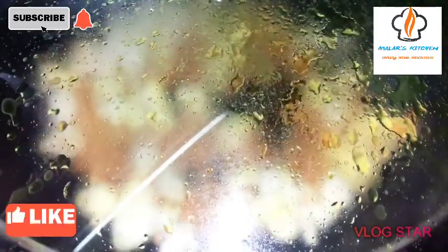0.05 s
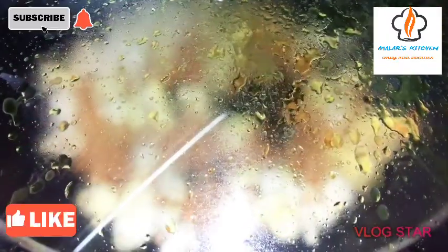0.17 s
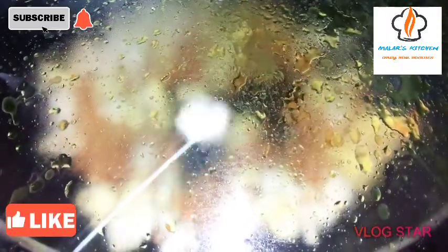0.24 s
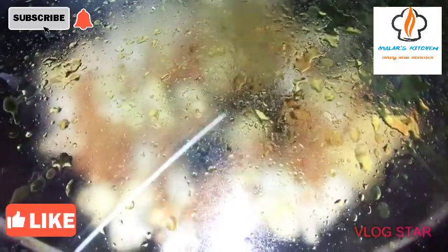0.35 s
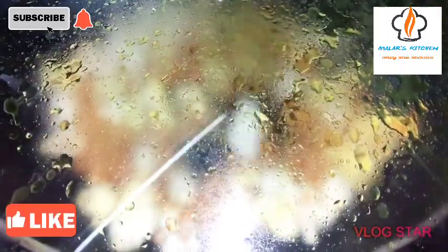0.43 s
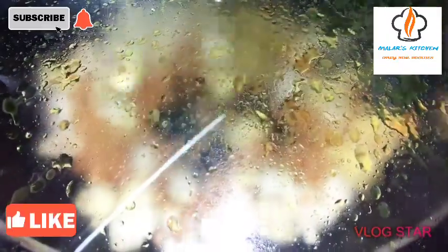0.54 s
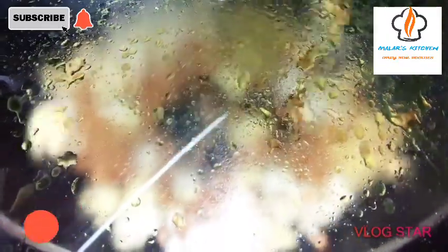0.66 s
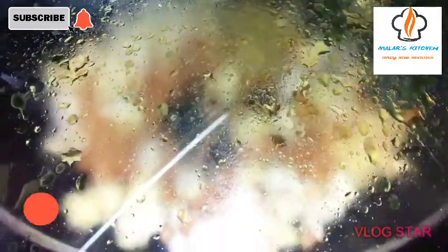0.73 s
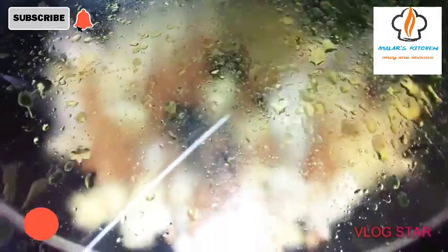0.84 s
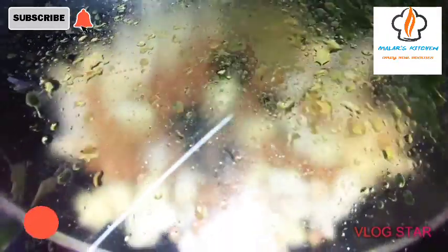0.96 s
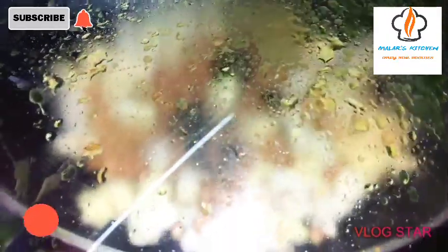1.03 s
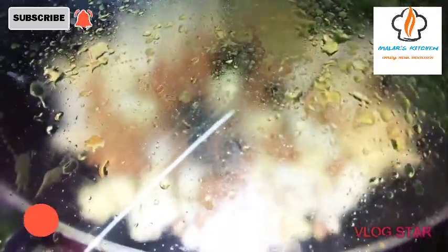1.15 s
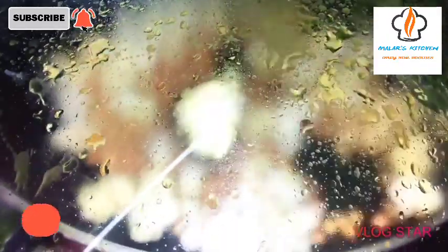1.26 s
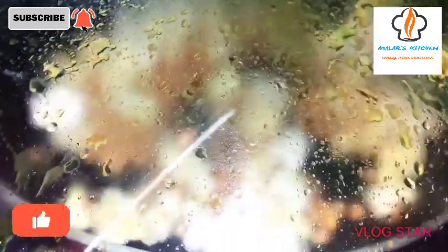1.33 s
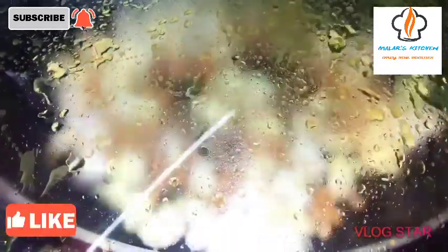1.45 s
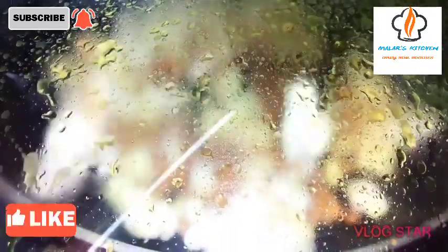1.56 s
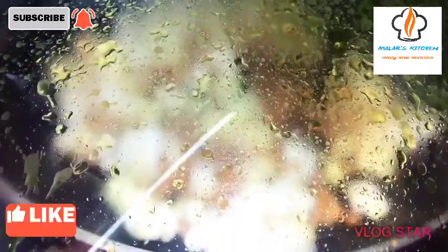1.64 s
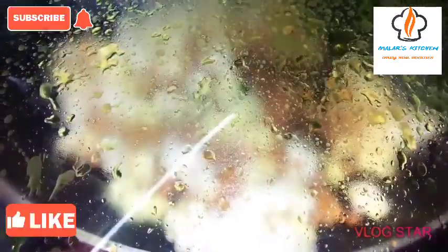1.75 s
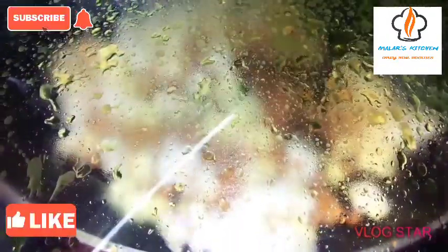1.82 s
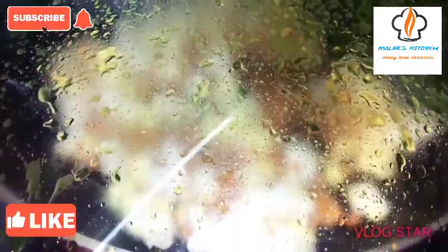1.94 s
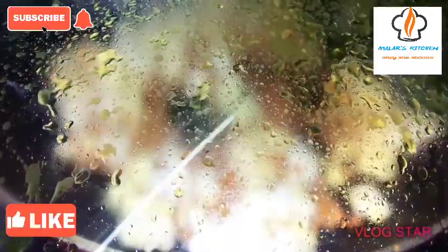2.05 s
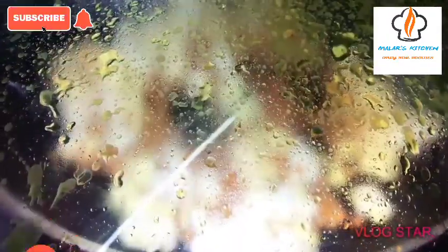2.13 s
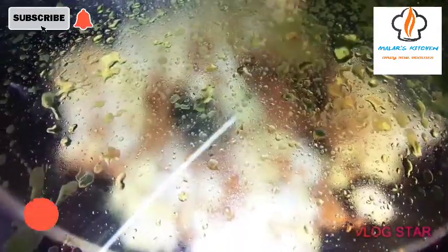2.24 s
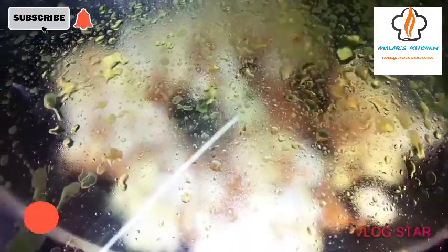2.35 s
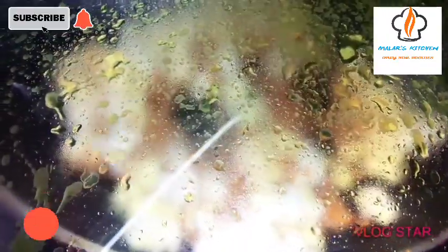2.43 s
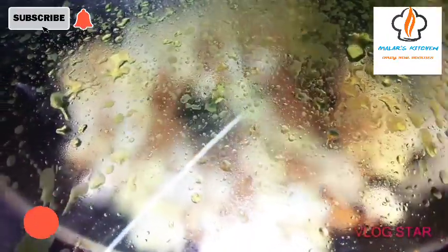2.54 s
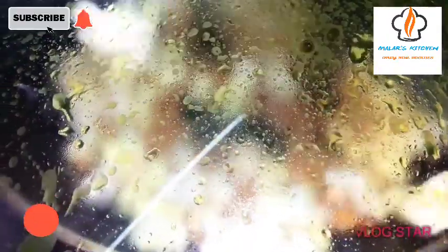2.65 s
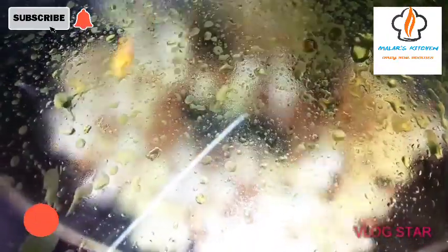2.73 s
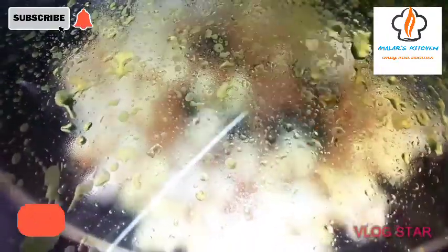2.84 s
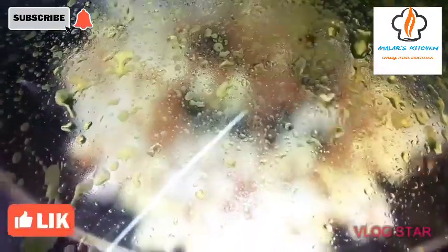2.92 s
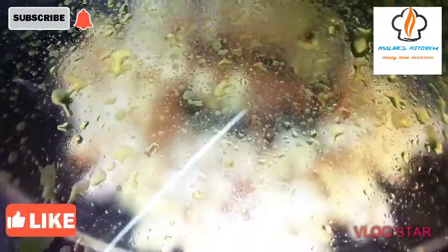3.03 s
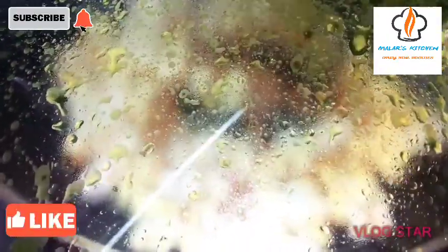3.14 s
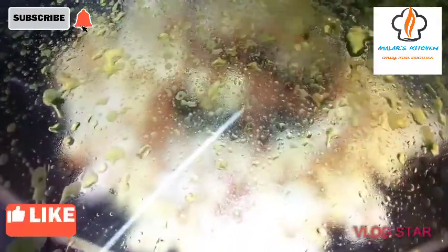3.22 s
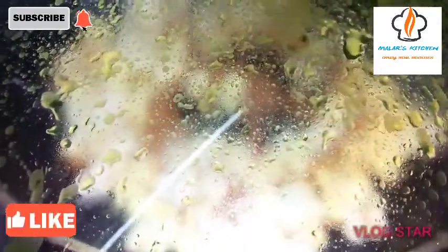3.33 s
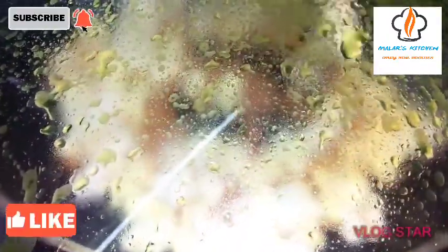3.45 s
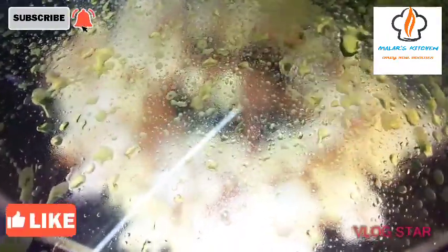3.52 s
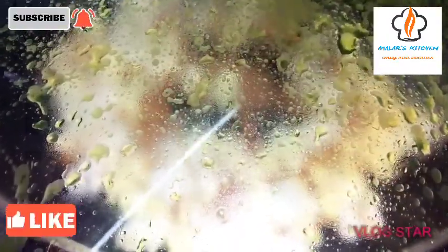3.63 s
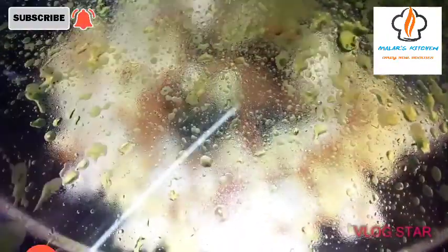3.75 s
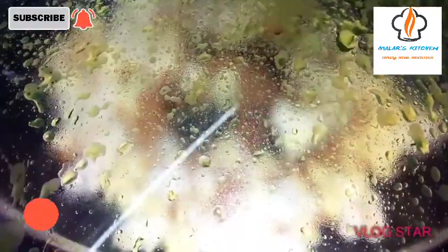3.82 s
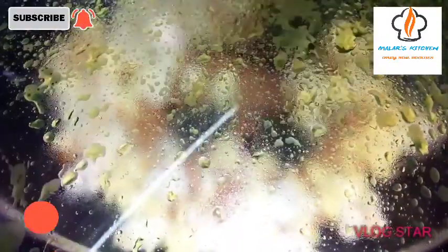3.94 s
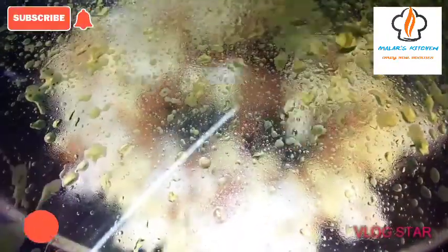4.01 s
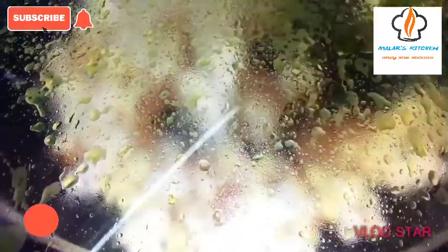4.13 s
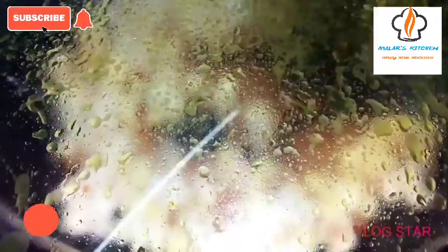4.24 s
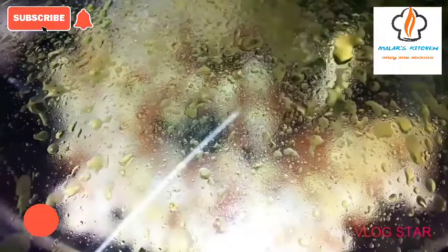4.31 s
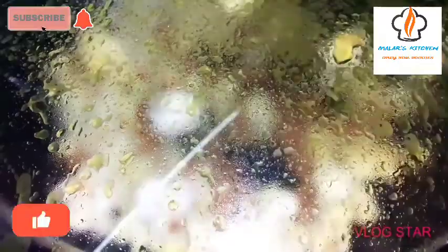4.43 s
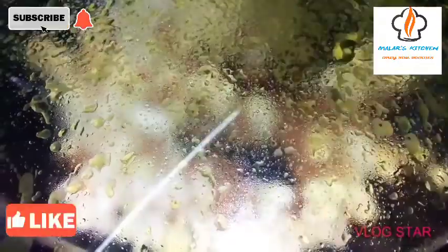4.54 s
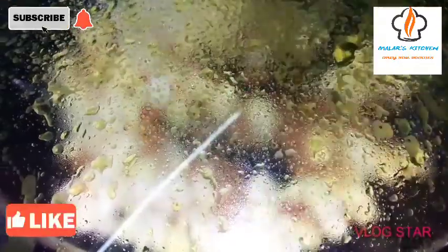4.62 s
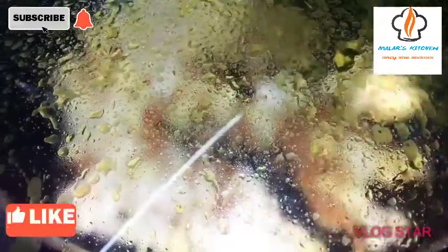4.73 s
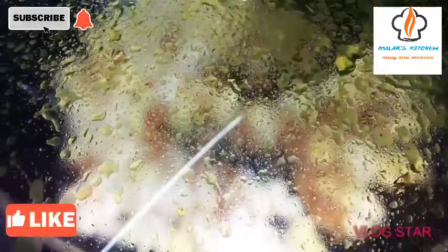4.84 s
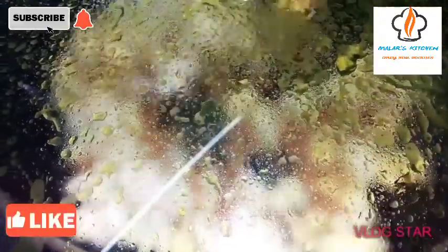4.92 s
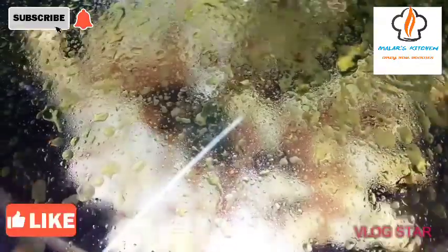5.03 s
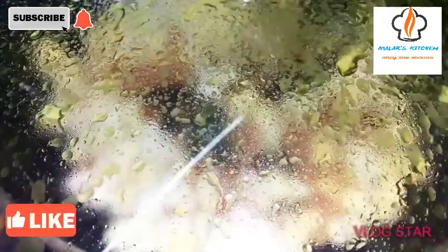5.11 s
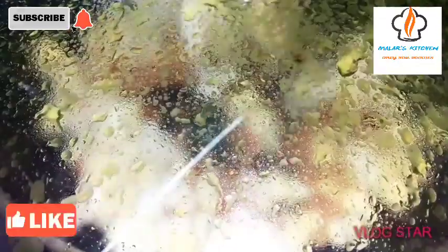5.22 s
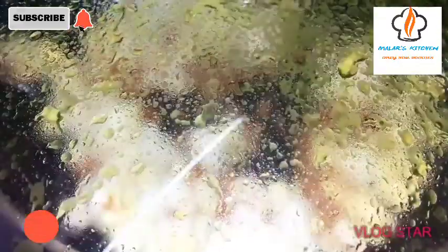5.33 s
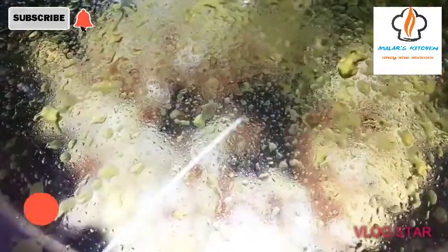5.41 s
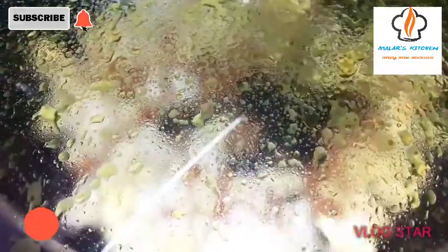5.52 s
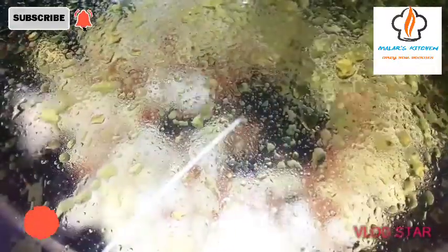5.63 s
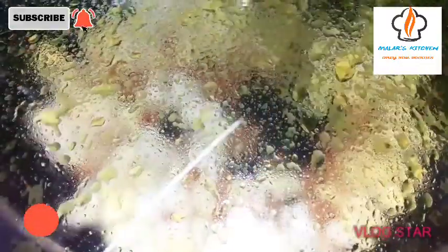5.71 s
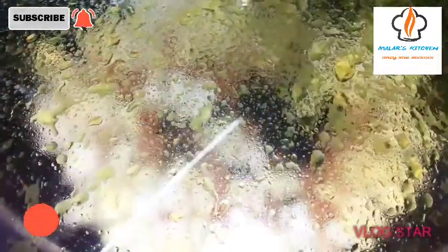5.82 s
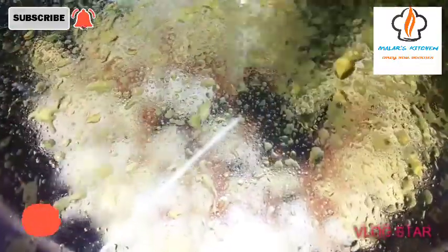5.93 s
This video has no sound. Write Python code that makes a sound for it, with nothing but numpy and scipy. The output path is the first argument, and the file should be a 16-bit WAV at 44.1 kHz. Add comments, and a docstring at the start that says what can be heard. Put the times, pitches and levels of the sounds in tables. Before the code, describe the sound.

Dry, snappy pops and small pings against a lid come ever faster above faint frying and a low stove drone.

```python
"""Oil sizzles quietly over the low drone of a stove; then popcorn pops in a pan under a glass lid.
Sizzle, a steamy hiss near the end and drone are shaped noise: bubbles add grain, resonances hum.
Each pop is a torn-noise crack with splinters, a kick and a thump on the pan, and a puff of steam.
These excite decaying modes of air, pan, stand and rim; a small kitchen reflects the pops to a close phone.
Dry ticks follow, steam spits from a few hulls, knocks and soft scuffs sound, and hard kernels ping the lid."""
import sys
import numpy as np
from scipy import signal
from scipy.fft import rfft, irfft, next_fast_len
from scipy.io import wavfile
from scipy.ndimage import map_coordinates

SR = 44100
rng = np.random.default_rng(int(sys.argv[2]) if len(sys.argv) > 2 else 0)


def digitize_waveform(pressure):
    """Quantize a signal to 16-bit integers and store it at the path in sys.argv[1].

    Rows of a 2-D input are taken as channels; values are limited to [-1, 1].
    """
    field = np.atleast_2d(pressure).T
    bounded = np.clip(field, -1, 1)
    quanta = np.round(bounded * 32767).astype(np.int16)
    wavfile.write(sys.argv[1], SR, quanta)


N = 263277
TIME = np.arange(N) / SR  # s

# Stove drone spectrum: (frequency [Hz], relative level [dB])
STOVE_SPECTRUM = [(20, -21), (45, -33), (90, 2), (160, -1.5), (200, -4.5), (270, -17.5), (340, -5.5),
                  (450, -16.5), (900, -14), (3000, -75)]
# Stove loudness: (time [s], level [dB])
STOVE_LEVEL = [(0, -58.5), (.8, -59.5), (1.5, -57.5), (3, -57), (5.97, -53.5)]
# Frying oil spectrum: (frequency [Hz], relative level [dB])
OIL_SPECTRUM = [(300, -27), (700, -11.5), (1800, 0), (2100, -5), (2900, -4), (3700, -2), (4800, -0.5),
                (7400, -2.5), (8200, -5.5), (9600, -5.5), (11800, -29), (13700, -11), (14800, -9),
                (16000, 2.5)]
# Sizzle loudness: (time [s], level [dB])
SIZZLE_LEVEL = [(0, -48), (.3, -47), (1.1, -46), (2.5, -46), (3.3, -45.5), (3.7, -47.5), (4.7, -47.5),
                (5.97, -44.5)]
# Resonances of the covered pan that colour the sizzle: (frequency [Hz], width [Hz], relative level [dB])
SIZZLE_RESONANCES = [(2055, 15, 7.5), (2215, 18, -0.5), (2290, 15, 6), (2663, 27, 5), (2870, 40, -5.5),
                     (3100, 17, 4.5), (4830, 31, 3.5), (5200, 51, -14), (5570, 80, -4.5), (6540, 84, -1),
                     (6640, 70, -9), (7530, 116, -1.5), (9540, 270, -4), (10870, 420, -11.5)]
# Hiss of moisture in the oil: (time [s], level [dB])
STEAM_LEVEL = [(5.2, -81), (5.3, -35.5), (5.45, -37), (5.56, -35), (5.63, -42), (5.7, -58)]
# Spectrum of that hiss: (frequency [Hz], relative level [dB])
STEAM_SPECTRUM = [(1000, 0.5), (3000, 5.5), (5600, -12), (7800, 5), (8800, 12.5), (10500, 3), (13300, -10),
                  (15000, 6.5)]
# Bursting kernels: (time [s], crack level [dB], crack pitch [Hz], kick on the pan [dB],
# steam puff [dB], splintering of the hull [dB])
POPS = [(0.2986, -16, 4830, -34.5, -30, -34.5), (0.3954, -13.5, 6600, -33.5, -34, -25),
        (0.5592, -13.5, 6040, -29, -27.5, -28), (0.816, -15.5, 6900, -29.5, -28, -32),
        (1.2457, -11, 5340, -30.5, -36, -24.5), (1.3255, -15, 5560, -33, -33, -29),
        (1.4889, -13.5, 5540, -40, -34, -33), (1.5126, -21, 5100, -31, -37.5, -30.5),
        (1.545, -10, 5900, -36, -43, -24), (1.5771, -13, 5900, -39, -34, -22.5),
        (2.0232, -15, 5200, -33.5, -29, -24), (2.0388, -14, 5370, -34, -37, -36),
        (2.2355, -9, 5760, -36, -36, -22), (2.5841, -26, 4000, -31.5, -38.5, -35),
        (2.6224, -7, 5400, -25.5, -30, -24.5), (2.8135, -14.5, 5300, -37, -55, -34),
        (2.8224, -15, 5670, -32, -29, -28), (3.0898, -17.5, 4230, -29, -37.5, -36.5),
        (3.4388, -10, 3840, -29, -33.5, -31.5), (3.7543, -15.5, 5300, -28, -38, -33.5),
        (3.8771, -13.5, 4600, -29, -33.5, -31), (4.0502, -20, 7400, -31.5, -43.5, -54),
        (4.116, -13.5, 5620, -30, -29.5, -22), (4.213, -12.5, 5240, -38, -41, -34),
        (4.228, -13.5, 3980, -29.5, -32.5, -25.5), (4.3278, -14, 5580, -31, -31, -24),
        (4.4401, -8, 5100, -27, -33.5, -19), (4.5005, -7.5, 5600, -29.5, -30.5, -27),
        (4.778, -16, 5230, -36, -44.5, -30), (4.9521, -9, 4980, -30.5, -39.5, -49),
        (5.0185, -5.5, 6000, -30.5, -29, -18), (5.2031, -15, 6500, -28, -31.5, -33),
        (5.292, -10, 5600, -32.5, -29, -28), (5.3203, -9, 5050, -30, -42, -28),
        (5.369, -12.5, 5070, -34, -34.5, -28.5), (5.5163, -13, 4900, -29.5, -41.5, -31),
        (5.5505, -10.5, 6860, -37, -29, -27), (5.682, -13, 5600, -32.5, -28, -29),
        (5.8333, -12, 5900, -33, -38, -26.5), (5.9563, -18.5, 8400, -31, -30, -20)]
# Crack of a hull: (frequency [Hz], relative level [dB])
CRACK_SPECTRUM = [(1500, -17), (2800, -4), (4000, -3.5), (5500, -1.5), (7200, -4.5), (9300, -2),
                  (10300, -8), (12300, -14.5), (13800, -18), (14600, 2), (15700, 3)]
# Damped pan bottom: (frequency [Hz], width [Hz], relative level [dB])
PAN_BODY = [(1312, 145, 4.5), (1944, 170, 2), (2277, 35, 5.5), (2522, 66, 6.5)]
# Air under the lid: (frequency [Hz], width [Hz], relative level [dB])
AIR_BODY = [(526, 128, 14.5), (714, 69, -8)]
# The whole pan on its stand: (frequency [Hz], width [Hz], relative level [dB])
STAND_BODY = [(126, 76, 2), (224, 54, 6), (332, 88, -13)]
# Lasting ring of the air under the lid: (frequency [Hz], relative level [dB], t60 [s])
AIR_MODES = [(389, -16, 0.42), (450, -44, 0.32), (508.7, -11, 0.3), (566.7, -2, 0.51), (600, -18, 0.23)]
# Lasting ring of the pan on its stand: (frequency [Hz], relative level [dB], t60 [s])
STAND_MODES = [(101.3, -11.5, 0.65), (144.4, -6, 0.47), (200.3, -6, 0.82), (227.2, -11, 0.34),
               (287.4, -12, 0.53)]
# Lasting ring of the pan's metal: (frequency [Hz], relative level [dB], t60 [s])
PAN_MODES = [(1356, -3, 0.074), (1973, -6.5, 0.19), (2210, -14, 0.16), (2620, -5.5, 0.056)]
# Thin, high modes of the rim and lid: (frequency [Hz], relative level [dB], t60 [s])
RIM_MODES = [(3200, -15, 0.07), (3930, -21.5, 0.16), (4640, -42, 0.064), (5400, -38, 0.16),
             (5740, -28, 0.12), (5600, -8, 0.073), (6900, -25, 0.37), (7200, -24, 0.13), (8700, -24, 0.08),
             (9600, -22, 0.093)]
# Dry ticks with little thump, popped pieces landing and perhaps a few small pops:
# (time [s], level [dB], pitch [Hz])
DRY_TICKS = [(0.3396, -23, 5370), (0.4409, -26.5, 5900), (0.8689, -22, 4330), (1.5924, -14.5, 5800),
             (1.6084, -19, 3820), (2.0662, -19, 3880), (2.7084, -17, 5070), (2.8629, -23, 5040),
             (2.8804, -20.5, 7900), (3.7763, -21.5, 9100), (3.8975, -12, 3800), (4.0692, -20, 8400),
             (4.1344, -10, 5130), (4.3424, -23, 4860), (4.5704, -23.5, 5850), (4.6294, -26.5, 3720),
             (4.9584, -11, 5450), (5.3074, -16, 5300), (5.3824, -18.5, 4720), (5.5747, -19, 8770)]
# The few hulls that leak steam just before they burst: (time [s], level [dB])
LEAKS = [(0.5538, -27.5), (1.242, -48), (2.020, -54), (2.812, -39), (4.1115, -31), (5.288, -54),
         (5.676, -40), (5.829, -33)]
# Dull, hollow knocks: (time [s], level [dB])
KNOCKS = [(1.027, -38.5), (4.790, -37.5)]
# Body of a knock: (frequency [Hz], width [Hz], relative level [dB])
KNOCK_BODY = [(709, 31, 9), (1056, 78, 5.5), (1800, 260, 0.5)]
# Soft scuffs, the rough part of a knock or the heap of kernels sliding and settling:
# (time [s], first level [dB], brightest pitch [Hz], length [s])
SCUFFS = [(1.033, -43.5, 1720, .03), (1.426, -32.5, 1940, .03), (1.455, -42, 1650, .03),
          (1.578, -38.5, 1860, 0.14), (1.789, -41, 2220, 0.14), (4.115, -27, 3770, 0.048),
          (4.794, -38, 2480, 0.13)]
# Hard, unpopped kernels that strike the lid: (time [s], level [dB], pitch of the contact [Hz])
PINGS = [(1.699, -22.5, 5550), (2.606, -13.5, 3350), (2.689, -21, 5000), (2.691, -13, 2060),
         (2.728, -25, 5000), (2.926, -33, 5650), (3.879, -13, 1920), (3.916, -28, 5900), (3.967, -40, 5460),
         (4.477, -22.5, 1320), (4.777, -28.5, 1290), (5.323, -43, 5500), (5.369, -21.5, 1380),
         (5.49, -32, 5550)]
# Modes of the lid: (frequency [Hz], relative level [dB], t60 [s])
LID_MODES = [(1323, 1.5, 0.042), (1954, -13.5, 0.14), (3230, -16, 0.077), (5480, -10, 0.11),
             (5610, -6, 0.2)]
# Reverberation of the kitchen: (frequency [Hz], t60 [s])
KITCHEN_T60 = [(100, 0.29), (500, 0.43), (1500, 0.69), (4000, 0.32), (10000, 0.32), (16000, 0.19)]
# Strength of the reflections: (frequency [Hz], relative level [dB])
WALL_REFLECTION = [(100, -5.5), (220, 9), (330, 5.5), (420, -5.5), (560, 3.5), (730, 5.5), (850, -3.5),
                   (1300, -4.5), (3000, -2), (8000, -5.5), (15000, 3)]

# A stronger burst tears its hull faster: the tear time halves for every TEAR_HALVES_DB.
TYPICAL_CRACK_DB, TEAR_S, TEAR_HALVES_DB = -7.5, 0.0038, 12.5
SPLINTER_HZ = 8660  # above this the splinters of the hull take over from its crack
# Every burst thumps the pan much alike, a little more with more steam and as the pan fills.
TYPICAL_PUFF_DB, THUMP_DB, THUMP_FOLLOWS, THUMP_DB_PER_S = -36, -42, 0.45, 0.78
# A duller, heavier tick kicks the pan harder.
TICK_HZ, TICK_KICK_DB, DULLER_DB_PER_OCTAVE = 4870, -24.5, 6
# Within one row of scuffs: time between them, time constant of each, fall over the whole row
SCUFF_GAP_S, SCUFF_S, SETTLE_DB = 0.047, 0.027, 5
CLICK_HZ, CLICK_DB_PER_OCTAVE = 5650, 9  # a harder, higher contact clicks more
TOP_HZ = 15750  # band limit of the phone


def amp(db):
    """Logarithmic level: decibels to amplitude ratio."""
    return 10 ** (np.asarray(db) / 20)


def unit(x):
    """Mean power: scale a signal to rms 1."""
    return x / np.sqrt(np.mean(x ** 2) + 1e-20)


def level(rows):
    """Envelope: gain per sample, linear in decibels between (s, dB) points."""
    return amp(np.interp(TIME, *np.transpose(rows)))


def along(points, hz):
    """Logarithmic pitch: (Hz, value) points interpolated on an octave-like axis."""
    f, values = np.transpose(points)
    return np.interp(np.log(hz + 1), np.log(f), values)


def hump(f, hz, octaves):
    """Spectral selectivity: a bell from 0 to 1 around one pitch."""
    return np.exp(-0.5 * (np.log2((f + 1) / hz) / octaves) ** 2)


def filtered(x, response):
    """Linear filtering: a spectrum multiplied by a response of frequency."""
    size = next_fast_len(2 * len(x))
    spectrum = rfft(x, size) * response(np.fft.rfftfreq(size, 1 / SR))
    return irfft(spectrum, size)[:len(x)]


def causal(db):
    """Causality: the minimum-phase response with these gains sounds only after the blow."""
    cepstrum = irfft(np.log(amp(db)))
    half = len(cepstrum) // 2
    cepstrum[1:half] *= 2
    cepstrum[half + 1:] = 0
    return np.exp(rfft(cepstrum))


def resonances(modes, f):
    """Superposition of damped oscillators: response of a body with (Hz, width Hz, dB) modes."""
    return sum(amp(db) * 1j * f * width / (centre ** 2 - f ** 2 + 1j * f * width)
               for centre, width, db in modes)


def burst(t60, size=4096):
    """Exponential decay: noise that falls 60 dB in t60 seconds."""
    return rng.standard_normal(size) * amp(-60 * np.arange(size) / SR / t60)


def tear(length, size=4096):
    """Sudden rupture: noise with a Gaussian fall that holds for a moment and then stops."""
    return rng.standard_normal(size) * np.exp(-(np.arange(size) / SR / length) ** 2)


def blow(x, db, span):
    """Energy of a transient: give x that of a sound holding db for span seconds."""
    return amp(db) * x * np.sqrt(span * SR / np.sum(x ** 2))


def push(body, t60, rough, detune=0.022):
    """Forced vibration: an impulse with a ragged wake drives a body whose pitch depends on the spot."""
    force = rough * burst(t60)
    force[0] += 1
    shift = np.exp(detune * rng.standard_normal())
    rolloff_hz = 2 * body[-1][0]
    return filtered(force, lambda f: resonances(body, f * shift) / (1 + 1j * f / rolloff_hz))


def ring(modes, scatter_db):
    """Free vibration: decaying (Hz, dB, t60) modes, struck at a new spot each time."""
    t = TIME[:SR // 2 + SR // 4]
    out = np.zeros(len(t))
    for hz, db, t60 in modes:
        strength = amp(db + scatter_db * rng.standard_normal())
        out += strength * amp(-60 * t / t60) * np.sin(2 * np.pi * hz * t)
    return out


def scuff(hz, length, octaves):
    """Friction noise: a short rub or click, brightest around one pitch."""
    return filtered(tear(length), lambda f: causal(45 * (hump(f, hz, octaves) - 1)))


def add(track, s, x):
    """Superposition: mix x into the track from time s."""
    start = max(round(s * SR), 0)
    part = x[:max(N - start, 0)]
    track[start:start + len(part)] += part


def kitchen(x, build=0.0048):
    """Reverberation: diffuse reflections thicken, then die at a rate set by frequency."""
    noise = rng.standard_normal(SR // 2 + SR // 8)
    hz, t, bands = signal.stft(noise, SR, nperseg=256)
    fade = amp(-60 * t / along(KITCHEN_T60, hz)[:, None])
    strength = amp(along(WALL_REFLECTION, hz))[:, None]
    tail = signal.istft(bands * fade * strength, SR, nperseg=256)[1]
    tail *= 1 - np.exp(-TIME[:len(tail)] / build)
    return signal.fftconvolve(x, tail / np.linalg.norm(tail))


def frying(spectrum, bubbles, grain):
    """Random arrivals: tiny bubbles burst, so many a second, on an even hiss."""
    ticks = (rng.random(N) < bubbles / SR) * rng.standard_normal(N)
    mixture = rng.standard_normal(N) + grain * unit(ticks)
    return unit(filtered(mixture, lambda f: amp(along(spectrum, f))))


def waver(rate, depth_db):
    """Slow amplitude modulation: a gain drifting through random points, rate of them a second."""
    points = rng.standard_normal(int(N * rate / SR) + 4)
    return amp(depth_db * map_coordinates(points, [TIME * rate]))


def oil(peaks_db=-5, flutter_db=1.0):
    """Resonant colouring: a sizzle rings faintly in the pan; a steamy hiss swells near the end."""
    ringing = np.zeros(N)
    for mode in SIZZLE_RESONANCES:
        band = filtered(rng.standard_normal(N), lambda f: resonances([mode], f))
        ringing += waver(3.92, flutter_db) * band
    sizzle = unit(frying(OIL_SPECTRUM, bubbles=1200, grain=0.81) + amp(peaks_db) * unit(ringing))
    steam = frying(STEAM_SPECTRUM, bubbles=600, grain=0.53)
    return level(SIZZLE_LEVEL) * sizzle + level(STEAM_LEVEL) * steam


def stove(hum_db=-5):
    """Narrow-band noise: a low drone with two humming bands."""
    drone = unit(filtered(rng.standard_normal(N), lambda f: amp(along(STOVE_SPECTRUM, f))))
    # (Hz, width Hz, dB) before squaring, which narrows the bands
    bands = [(94.8, 4.5, 0.35), (200.4, 9.6, 0.47)]
    hum = unit(filtered(rng.standard_normal(N), lambda f: resonances(bands, f) ** 2))
    return level(STOVE_LEVEL) * (drone + amp(hum_db) * hum)


def crack(hz, length, focus_db=10, octaves=0.55, wake=0.024):
    """Brittle fracture: a hull tears in milliseconds at its own pitch; the pan walls scatter a short wake."""
    rip = tear(length) + wake * burst(0.048)
    return filtered(rip, lambda f: causal(along(CRACK_SPECTRUM, f) + focus_db * hump(f, hz, octaves)))


def side(x, band):
    """Band splitting: the low or the high part of a crack."""
    return signal.sosfilt(signal.butter(4, SPLINTER_HZ, band, fs=SR, output="sos"), x)


def popcorn(room_db=-4, air_db=-4, stand_db=0, pan_db=-5, rim_db=-14):
    """Impulsive excitation: crack, splinters, kick, puff and thump set air, stand, pan and rim ringing."""
    out = np.zeros(N)
    for s, crack_db, hz, kick_db, puff_db, splinter_db in POPS:
        length = TEAR_S * 0.5 ** ((crack_db - TYPICAL_CRACK_DB) / TEAR_HALVES_DB)
        thump_db = THUMP_DB + THUMP_DB_PER_S * s + THUMP_FOLLOWS * (puff_db - TYPICAL_PUFF_DB)
        hull = side(crack(hz, length), "low")
        splinters = side(crack(SPLINTER_HZ, length, focus_db=17), "high")
        pop = blow(hull, crack_db, span=0.00047)
        pop += blow(splinters, splinter_db, span=0.0046)
        pop += blow(push(PAN_BODY, t60=0.034, rough=0.41), kick_db, span=0.0046)
        pop += blow(push(AIR_BODY, t60=0.022, rough=0.056), puff_db, span=0.0024)
        pop += blow(push(STAND_BODY, t60=0.015, rough=0.12), thump_db, span=0.0033)
        add(out, s, pop)
        add(out, s, amp(room_db) * kitchen(pop))
        add(out, s, amp(puff_db + air_db) * ring(AIR_MODES, scatter_db=1.33))
        add(out, s, amp(thump_db + stand_db) * ring(STAND_MODES, scatter_db=1.5))
        add(out, s, amp(kick_db + pan_db) * ring(PAN_MODES, scatter_db=4.0))
        add(out, s, amp(crack_db + rim_db) * ring(RIM_MODES, scatter_db=6.5))
    return out


def dry_ticks(room_db=-4, air_db=-4, rim_db=-14):
    """Light impact: a dry tick with a light kick on the pan, mostly a popped piece landing."""
    out = np.zeros(N)
    for s, db, hz in DRY_TICKS:
        kick_db = db + TICK_KICK_DB - DULLER_DB_PER_OCTAVE * np.log2(hz / TICK_HZ)
        tick = blow(crack(hz, length=0.0073), db, span=0.00084)
        tick += blow(push(PAN_BODY, t60=0.032, rough=0.18), kick_db, span=0.0047)
        tick += blow(push(AIR_BODY, t60=0.034, rough=0.079), kick_db + air_db, span=0.0077)
        add(out, s, tick)
        add(out, s, amp(room_db) * kitchen(tick))
        add(out, s, amp(db + rim_db) * ring(RIM_MODES, scatter_db=4.0))
    return out


def leaks(length=0.013, pan_db=12):
    """Jet noise: a short spit of steam through the first split in the hull, coloured by pan and air."""
    def response(f):
        body = resonances(PAN_BODY + AIR_BODY, f) / 2
        return causal(along(CRACK_SPECTRUM, f)) + amp(pan_db) * body

    out = np.zeros(N)
    for s, db in LEAKS:
        add(out, s, blow(filtered(tear(length), response), db, span=0.0097))
    return out


def knocks(room_db=-6):
    """Impact and friction: hollow knocks, and soft scuffs that weaken within each row."""
    out = np.zeros(N)
    for s, db in KNOCKS:
        knock = push(KNOCK_BODY, t60=0.047, rough=0.07, detune=0)
        add(out, s, blow(knock, db, span=0.025))
    for s, db, hz, length in SCUFFS:
        for k, delay in enumerate(np.arange(0, length, SCUFF_GAP_S)):
            # later scuffs stray by up to a quarter of the gap
            jitter = (k > 0) * SCUFF_GAP_S * (rng.random() - 0.5) / 2
            scuff_db = db - SETTLE_DB * delay / length
            rub = scuff(hz, SCUFF_S, octaves=2.27)
            add(out, s + delay + jitter, blow(rub, scuff_db, span=0.03))
    return out + amp(room_db) * kitchen(out)[:N]


def lid(room_db=-16, click_room_db=-5):
    """Selective excitation: hard kernels click on the lid, which rings most in modes near the contact pitch."""
    rings, clicks = np.zeros(N), np.zeros(N)
    for s, db, hz in PINGS:
        excited = []
        for mode_hz, mode_db, t60 in LID_MODES:
            mismatch_db = 30 * (hump(mode_hz, hz, octaves=0.34) - 1)
            excited.append((mode_hz, db + mode_db + mismatch_db, t60))
        add(rings, s, ring(excited, scatter_db=1.5))
        click_db = db + CLICK_DB_PER_OCTAVE * np.log2(hz / CLICK_HZ)
        add(clicks, s, blow(scuff(hz, length=0.0058, octaves=1.32), click_db, span=0.0025))
    reflected = kitchen(amp(room_db) * rings + amp(click_room_db) * clicks)[:N]
    return rings + clicks + reflected


def scene():
    """Superposition: every source adds at one microphone."""
    return (oil() + stove() + popcorn() + dry_ticks() + leaks() + knocks() + lid())[None]


def record(dry, ceiling=0.24):
    """Band limiting and saturation: the phone thins deep bass, rounds tall peaks and cuts the top."""
    x = signal.sosfilt(signal.butter(3, 68, "high", fs=SR, output="sos"), dry[0])
    x = x / (1 + np.abs(x / ceiling) ** 4) ** (1 / 4)
    return filtered(x, lambda f: f < TOP_HZ)[None]


dry = scene()
out = record(dry)
digitize_waveform(out)
```